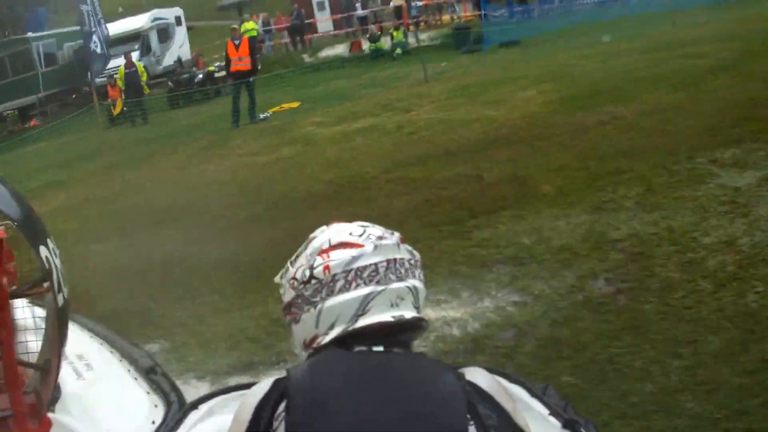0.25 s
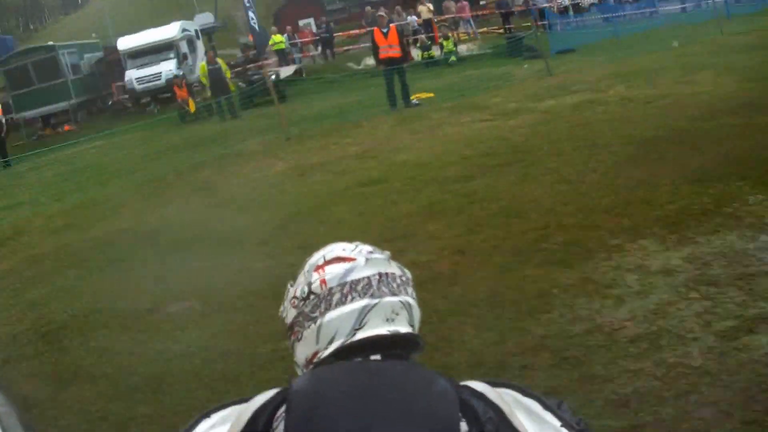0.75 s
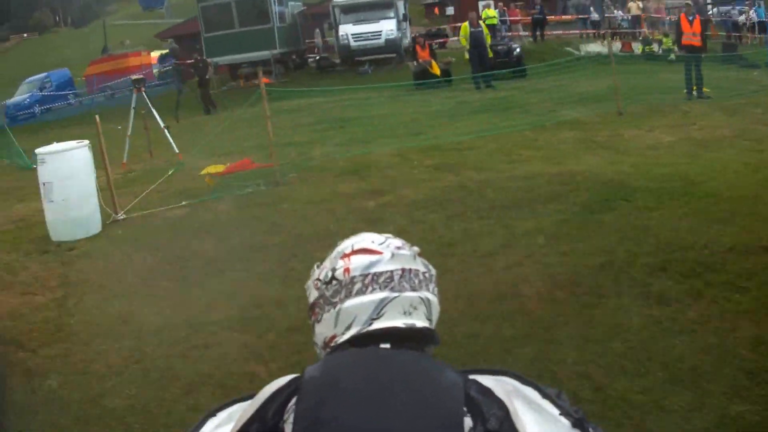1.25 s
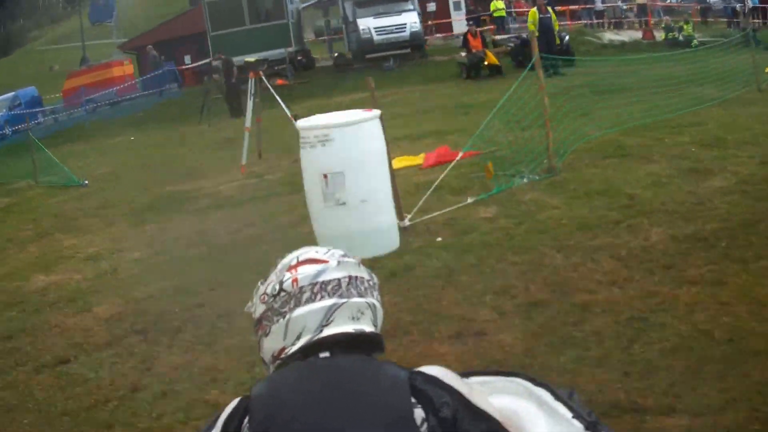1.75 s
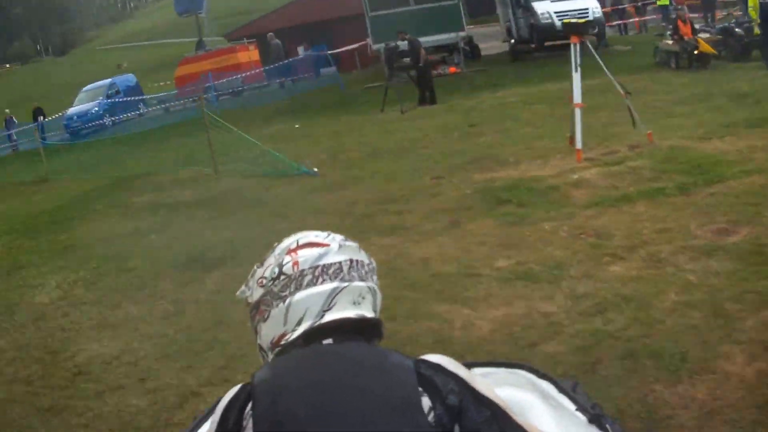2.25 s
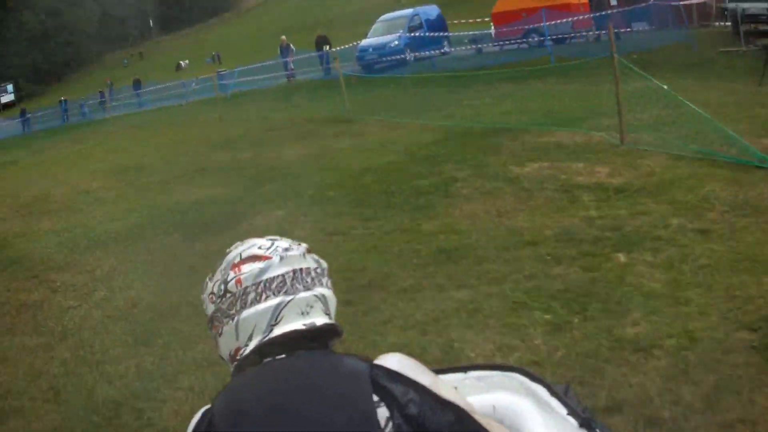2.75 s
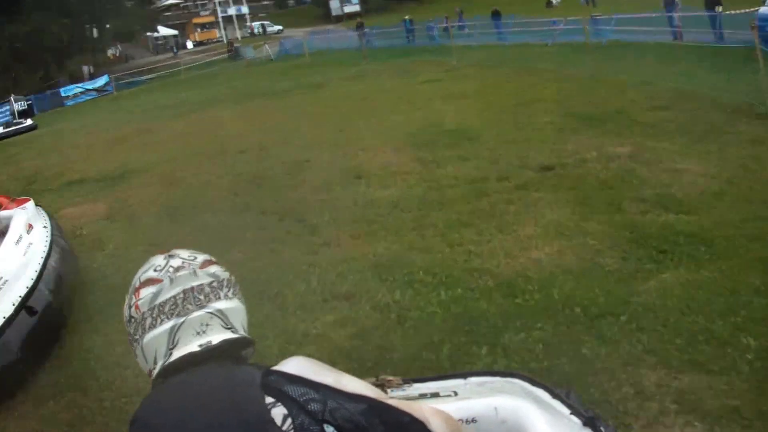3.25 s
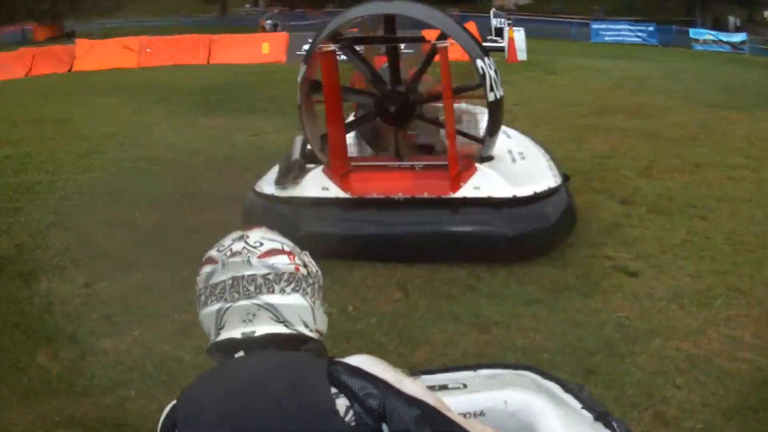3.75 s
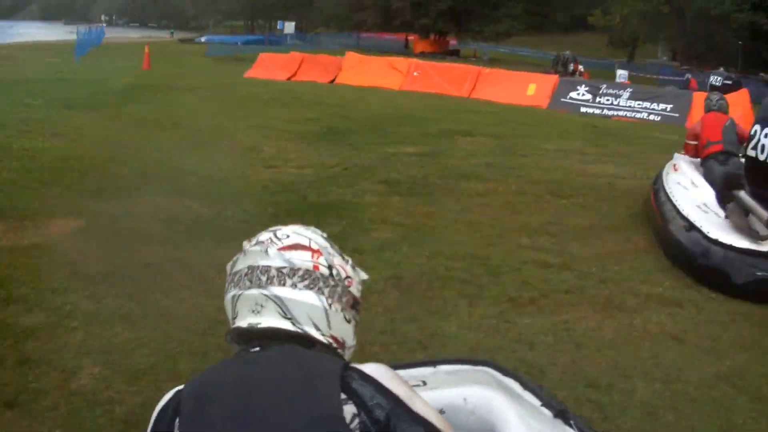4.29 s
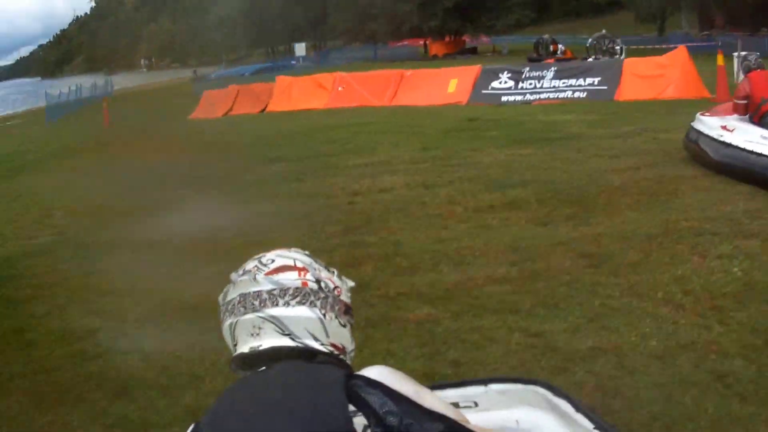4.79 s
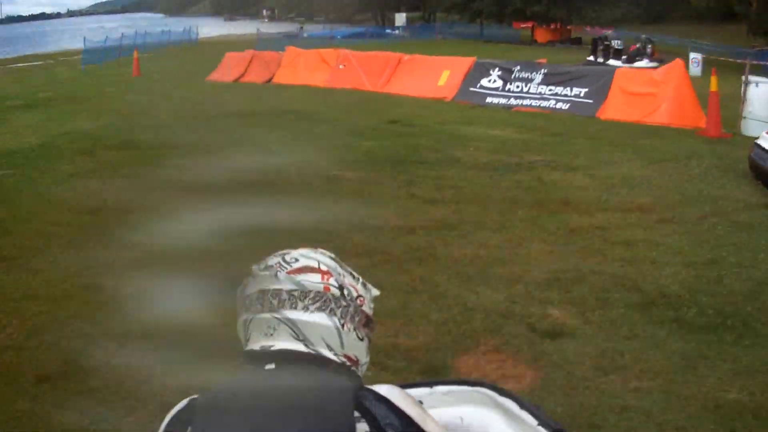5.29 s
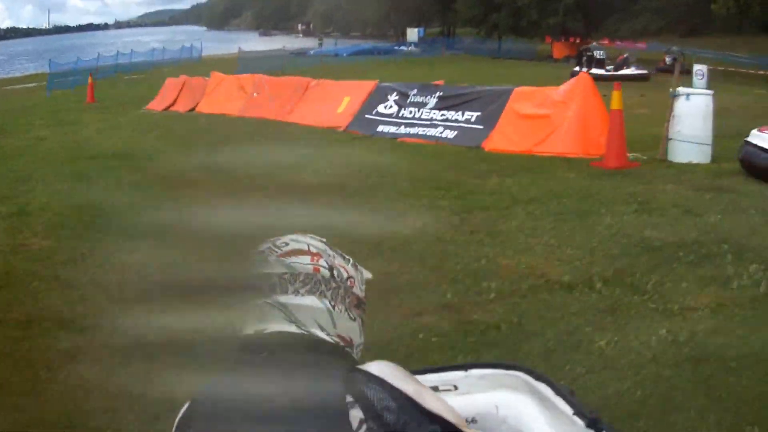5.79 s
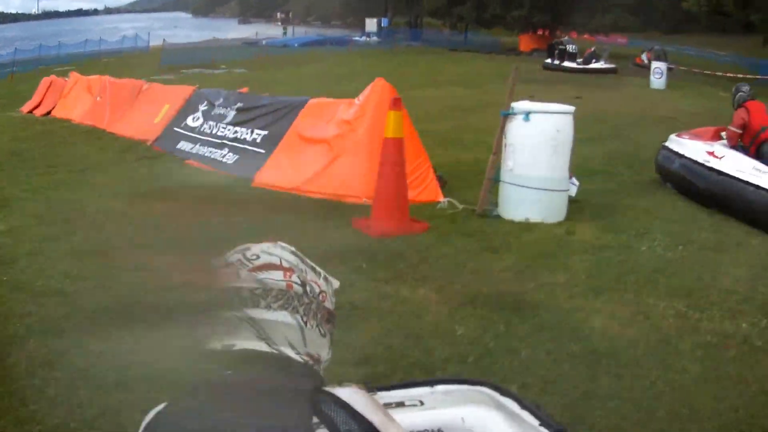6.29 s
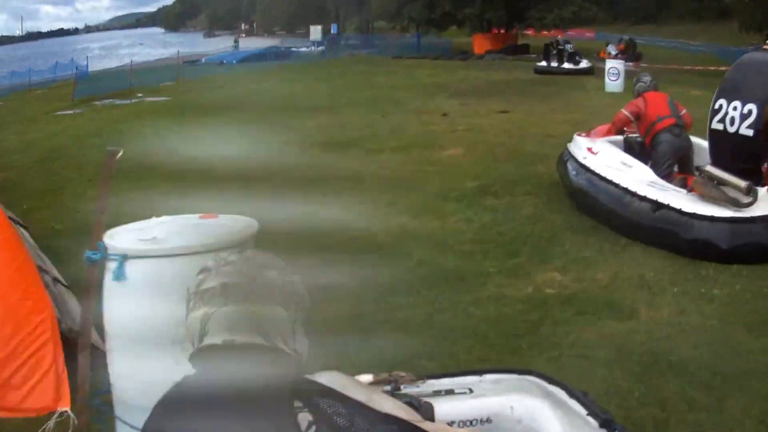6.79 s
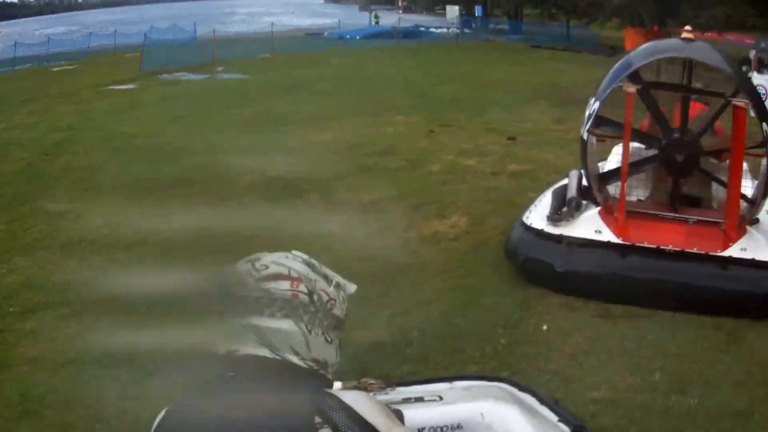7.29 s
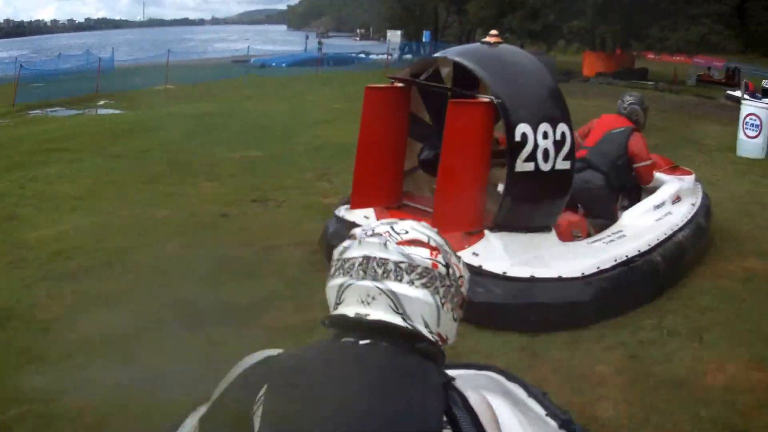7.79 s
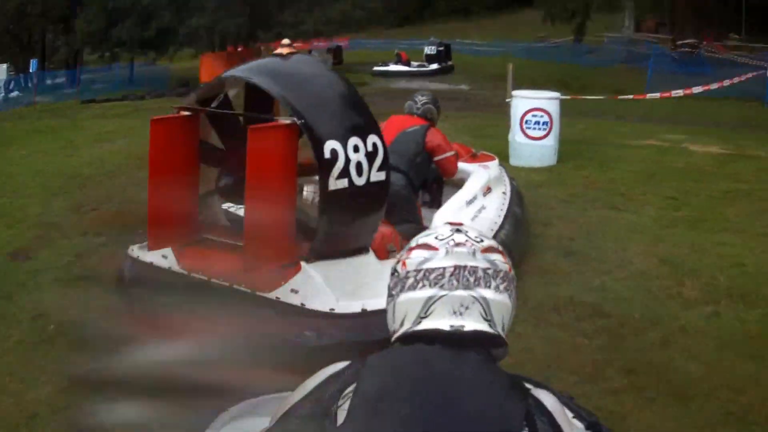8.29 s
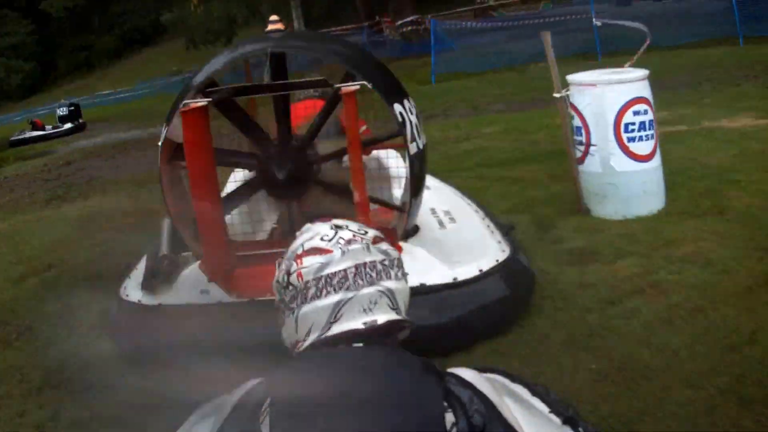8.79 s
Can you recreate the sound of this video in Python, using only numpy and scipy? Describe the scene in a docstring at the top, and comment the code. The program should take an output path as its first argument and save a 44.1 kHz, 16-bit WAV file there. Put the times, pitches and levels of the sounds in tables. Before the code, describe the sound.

Heard from inside a small housing close to the fan, a racing hovercraft's two-stroke engine buzzes steadily under thick air roar and hiss. Mount rattles and low wind thumps come in the first second. Revs climb slowly and the tone opens up, a tiny tick lands midway, then late on the throttle shuts, the note sags and barks back, with more bumps at the end.

```python
"""A racing hovercraft heard from inside a small closed housing on its fan duct. A two-stroke twin drives the
thrust fan by belt: firing and blade tones, both locked to crank angle, beat over filtered-noise air roar.
Bumps and wind shake the housing in the first second; the revs climb, the exhaust valve opens, and a speck
ticks on the housing at 4.3 s. A lone bump comes at 7.4 s, then the throttle shuts and the note sags; it
reopens at 7.64 s with a bark. More bumps and wind follow near 8.85 s, and the low end rises at the close."""
import sys
import numpy as np
from scipy import signal
from scipy.fft import rfft, irfft
from scipy.io import wavfile
from scipy.ndimage import uniform_filter1d

SR = 44100
rng = np.random.default_rng(int(sys.argv[2]) if len(sys.argv) > 2 else 0)


def digitize_waveform(pressure):
    """Quantize a signal to 16-bit integers and store it at the path in sys.argv[1].

    Rows of a 2-D input are taken as channels; values are limited to [-1, 1].
    """
    field = np.atleast_2d(pressure).T
    bounded = np.clip(field, -1, 1)
    quanta = np.round(bounded * 32767).astype(np.int16)
    wavfile.write(sys.argv[1], SR, quanta)


N = 398663
T = np.arange(N) / SR


def undb(db):
    """Level law: amplitude grows tenfold for every 20 dB."""
    return 10 ** (np.asarray(db) / 20)


def curves(table, at=T):
    """Piecewise-linear interpolation of each column against the first."""
    points, *columns = np.transpose(table)
    return [np.interp(at, points, column) for column in columns]


def unit(x):
    """Normalization to unit rms."""
    return x / np.sqrt(np.mean(x ** 2))


def band(x, lo_hz, hi_hz, order=2):
    """Butterworth bandpass filtering: maximally flat between the two edges."""
    return signal.sosfilt(signal.butter(order, [lo_hz, hi_hz], "bandpass", fs=SR, output="sos"), x)


def walk(rate_hz):
    """Slow random modulation: levels held for 1 / rate_hz, smoothed twice; spread near 1."""
    hold = int(SR / rate_hz)
    steps = np.repeat(rng.standard_normal(N // hold + 1), hold)
    return 1.25 * uniform_filter1d(uniform_filter1d(steps, hold), hold)[:N]


def turbulence(shape, flicker_db, rate_hz, count=6):
    """Broadband turbulence: coloured noise in overlapping bands that flicker independently; rms 1."""
    hz, db = np.transpose(shape)
    octave = np.log2(np.fft.rfftfreq(N, 1 / SR) + 1)
    colour_db = np.interp(octave, np.log2(hz), db, left=-90, right=-90)
    spectrum = rfft(rng.standard_normal(N)) * undb(colour_db)
    centres = np.linspace(np.log2(hz[0]), np.log2(hz[-1]), count)
    total = np.zeros(N)
    for row in np.eye(count):
        share = np.interp(octave, centres, row)
        total += undb(flicker_db * walk(rate_hz)) * irfft(spectrum * share, N)
    return unit(total)


# panel modes that lift a tone crossing them: mode_hz [Hz], half_width_hz [Hz], lift_db [dB at the mode]
PANELS = [(386, 27, 3.5), (625, 10, 2.5), (1202.4, 9.1, 5.5), (1438, 17, 4), (1720, 110, 0.5),
          (2056, 74, 2)]


def panels_db(hz, step=64):
    """Panel resonance: each mode lifts a tone in dB along a Lorentzian curve."""
    coarse_hz = hz[::step]  # the lift changes slowly
    lift = sum(db / (1 + ((coarse_hz - mode_hz) / width_hz) ** 2) for mode_hz, width_hz, db in PANELS)
    return np.repeat(lift, step)[:N]


# exhaust valve position: crank_hz [turns/s], open [0 shut to 1 open]
VALVE = [(99, .2), (103, .08), (105.9, .1), (106.9, .55), (109.2, .9), (111.5, 1)]
# overall gain on the exhaust note before the throttle acts: start_s [s], gain_db [dB]
EXHAUST_DB = [(0, -1), (.4, -3), (.85, 1.5), (2.9, 0.5), (3.6, 0.5), (4.5, -1), (6.6, 1), (7.3, 2.5),
              (7.95, 1), (8.55, 3), (8.82, -2), (9.04, 2)]
THROTTLE_SHUTS_S, THROTTLE_OPENS_S, THROTTLE_MOVE_S = 7.455, 7.64, .03
OVERRUN_DB = -14  # gain on the exhaust note with the throttle shut
SURGE_S = 0.13  # Gaussian spread of the bark after reopening


def drive(hz):
    """Engine load: speed opens the exhaust valve; the throttle cuts the note and its reopening makes a surge."""
    valve = curves(VALVE, hz)[0]
    opened = np.clip((T - THROTTLE_OPENS_S) / THROTTLE_MOVE_S, 0, 1)
    shut = np.clip((T - THROTTLE_SHUTS_S) / THROTTLE_MOVE_S, 0, 1) - opened
    surge = opened * np.exp(-((T - THROTTLE_OPENS_S) / SURGE_S) ** 2 / 2)
    return valve, curves(EXHAUST_DB)[0] + OVERRUN_DB * shut, surge


# base levels of the low tones by engine speed:
# crank_hz [turns/s], crank_db [dB rms], firing_db [dB rms], blade_db [dB rms]
HUM = [(95, -59, -43, -32), (97.8, -58, -44, -31.5), (98.7, -56.5, -48, -34.5), (101, -55.5, -43, -32.5),
       (103.3, -52.5, -40.5, -30.5), (104.6, -52.5, -40.5, -31.5), (105.8, -51, -37.5, -34),
       (107, -51, -37, -35), (110.3, -53, -35.3, -36.3), (112.3, -53, -36, -38.5)]
# phase lead of the firing tone: valve_shut_lead [rad], lead_per_hz [rad per Hz below reference], reference_hz [Hz]
FIRING_SHIFT = (.4, .06, 110.5)
SURGE_BLADE_DB = -3  # the blade tone stays low while the revs race up


def hum(hz, angle, blade, valve, surge):
    """Beating of neighbouring tones: two firings a turn against the blade passes, over the crank shake."""
    crank_db, firing_db, blade_db = curves(HUM, hz)
    by_valve, by_speed, reference_hz = FIRING_SHIFT
    lead = by_valve * (1 - valve) + by_speed * (reference_hz - hz)
    crank = undb(crank_db + 1.7 * walk(16)) * np.cos(angle + .1 * walk(20))
    firing = undb(firing_db + .6 * walk(14)) * np.cos(2 * angle + lead)
    blades = undb(blade_db + SURGE_BLADE_DB * surge + .6 * walk(14)) * np.cos(blade)
    # the crank shakes the fan: a sum tone
    sum_tone = undb(-58.5 + 2.0 * walk(9)) * np.cos(angle + blade)
    return np.sqrt(2) * (crank + firing + blades + sum_tone)


# base levels of the upper exhaust orders:
# order [multiple of crank speed], shut_db [dB rms, valve shut], open_db [dB rms, valve open]
EXHAUST = [(3, -60, -54), (4, -50, -42), (5, -48, -58), (6, -56, -59), (7, -60, -49), (8, -52, -57),
           (9, -51, -49), (10, -58, -59), (11, -55, -35), (12, -42, -44), (13, -50, -41), (14, -40, -45),
           (15, -45, -45), (16, -36, -50), (17, -41, -45), (18, -40, -43), (19, -45, -46), (20, -41, -46),
           (21, -46, -48), (22, -46, -55), (23, -53, -57), (24, -55, -55), (25, -53, -50), (26, -46, -53),
           (27, -53, -59), (28, -54, -53), (29, -52, -60), (30, -53, -64)]
BARK_ORDER, SURGE_DB = 11, 1.8  # the bark lifts orders above this one and thins those below


def exhaust(hz, angle, valve, load_db, surge):
    """Harmonic series of the crank: uneven burns shake the timing, which smears the high orders most."""
    shake = .018 * walk(30) + .015 * walk(5)  # radians of crank
    burns_db = load_db + 1.27 * walk(110)  # uneven burn strength
    out = np.zeros(N)
    for order, shut_db, open_db in EXHAUST:
        size = (1 - valve) * undb(shut_db) + valve * undb(open_db)
        flicker_db = min(0.14 * order, 2.2) * walk(7)
        bark_db = SURGE_DB * np.sign(order - BARK_ORDER) * surge
        gain = undb(burns_db + flicker_db + panels_db(order * hz) + bark_db)
        phase = order * (angle + shake) + rng.uniform(0, 2 * np.pi)
        out += size * gain * np.sqrt(2) * np.cos(phase)
    return out


def chopped_exhaust(pipe, blade):
    """Amplitude modulation: blades chop the exhaust note; the housing resonance favours a band of the result."""
    return .9 * band(pipe * np.cos(blade), 1467, 1730)


# base levels of the blade overtones: order [multiple of blade rate], level_db [dB rms]
BLADE = [(2, -51.5), (3, -53.5), (4, -58.5), (5, -56.5), (10, -47.5)]


def fan(hz, blade):
    """Blade-passing overtones: blades crossing the duct struts sound at multiples of their passing rate."""
    out = np.zeros(N)
    for order, db in BLADE:
        gain = undb(db + 3.4 * walk(9) + panels_db(order * hz))
        out += gain * np.sqrt(2) * np.cos(round(order) * blade)
    return out


# mount rattles: start_s [s], level_db [dB, envelope one length after the start], length_s [s]
BUMPS = [(0.5207, -43, 0.022), (0.555, -35, 0.019), (0.586, -48, 0.02), (0.715, -41, 0.022),
         (0.824, -36.5, 0.022), (0.873, -39, 0.022), (0.914, -43, 0.022), (7.407, -41, 0.026),
         (8.805, -43, 0.022), (8.848, -41, 0.028), (8.905, -41, 0.026)]
THUD_DB = -14  # thud through the hull, relative to the chatter


def bumps():
    """Impact excitation: each jolt sets the mount chattering in a short swell, with a dull hull thud."""
    main = band(rng.standard_normal(N), 3450, 4730, order=4)
    bright = 0.19 * band(rng.standard_normal(N), 4800, 6800, order=4)
    low = .5 * band(rng.standard_normal(N), 1400, 2900, order=3)
    chatter = unit(main + bright + low)
    thud = unit(band(rng.standard_normal(N), 35, 400))
    out = np.zeros(N)
    for start_s, db, length_s in BUMPS:
        u = np.maximum(T - start_s, 0) / max(length_s, .005)
        out += undb(db) * u * np.exp(1 - u ** 2) * (chatter + undb(THUD_DB) * thud)
    return out


# speck striking the housing: start_s [s], level_db [dB, initial amplitude before the bandpass]
GRIT = [(4.2946, -26)]


def grit():
    """Damped free vibration: a tick rings the stiff housing wall at 14.6 kHz and dies exponentially."""
    out = np.zeros(N)
    for start_s, db in GRIT:
        u = np.maximum(T - start_s, 0)
        out += undb(db) * np.exp(-u / .0012) * np.sin(2 * np.pi * 14600 * u)
    return band(out, 11000, 17000)


# base level of the air: start_s [s], roar_db [dB], hiss_db [dB], top_hiss_db [dB]
AIR = [(0, -26, -44.5, -53), (.35, -24.5, -44.5, -50.5), (.9, -25.5, -45.5, -54.5),
       (1.2, -27.5, -46.5, -54.5), (1.7, -26, -47, -55), (2.6, -28, -47.5, -55.5), (3.8, -25.5, -47, -55.5),
       (4.38, -25.3, -46, -53), (5.5, -26, -47, -55), (6.7, -26.5, -47, -54.5), (7.1, -26.5, -46.5, -52.5),
       (7.45, -26.5, -45.5, -55), (7.53, -28.5, -50, -58), (8.1, -26, -47, -55.5),
       (8.75, -26.5, -46.5, -53.5), (9.04, -25.5, -44.5, -54)]
# relative spectra inside the housing: pitch_hz [Hz], density_db [dB per Hz]
ROAR = [(130, -29.5), (300, -20.5), (450, -16.5), (900, -16.5), (1150, -13), (1330, -4), (1440, 1),
        (1560, -4), (1850, -1), (1985, 1.5), (2120, -5.5), (2450, -13), (3050, -10), (3400, -20.5),
        (4200, -40)]
HISS = [(2800, -19), (3500, 3.5), (3900, -4.5), (4400, 0.5), (4800, -4.5), (5300, -11), (5900, -7.5),
        (6500, -12), (7300, -7), (8050, -20.5), (8350, -18.5), (8900, -50), (9300, -45)]
TOP_HISS = [(8900, -57), (9300, -24), (10500, -13), (11000, -15.5), (12000, -6.5), (12700, -11.5),
            (13450, -4), (14000, -5), (14650, 0), (15250, -7.5)]
ROAR_WANDER_DB, HISS_WANDER_DB = .5, .7  # hiss and top hiss swell together


def air(angle, blade):
    """Modulated turbulence: duct roar and hiss, pulsed a little by firings and blades."""
    roar_db, hiss_db, top_db = curves(AIR)
    roar_db = roar_db + ROAR_WANDER_DB * walk(10)
    pulse = 1 + 0.075 * np.cos(angle) + 0.12 * np.cos(2 * angle) + 0.021 * np.cos(blade)
    rasp_db = 0.55 * walk(200)  # uneven gas puffs roughen the roar
    puffs = 1 + 0.042 * np.cos(2 * angle) + .06 * np.cos(blade)
    puffs = puffs * undb(HISS_WANDER_DB * walk(25))
    roar = undb(roar_db + rasp_db) * pulse * turbulence(ROAR, 0.8, 8, count=9)
    hiss = undb(hiss_db) * puffs * turbulence(HISS, 0.98, 12)
    top_hiss = undb(top_db) * puffs * turbulence(TOP_HISS, 1.8, 60, count=8)
    return roar + hiss + top_hiss


# brief low swells: wind hitting the housing, except the last row, where the low end just rises at the close:
# centre_s [s], level_db [dB at the centre, added to the steady buffet], half_length_s [s to fall to 1/e]
LOW_SWELLS = [(.2, -63, 0.065), (.55, -56, 0.056), (.85, -57, .04), (4.38, -65, 0.14), (7.5, -62, .1),
              (8.87, -53, 0.046), (9.02, -59, .04)]
# relative spectrum of hull and skirt drumming: pitch_hz [Hz], density_db [dB per Hz]
RUMBLE = [(85, -1), (130, 3), (190, 19), (300, 11.5), (420, -47), (800, -23)]
RUMBLE_DB, RUMBLE_WANDER_DB, BUFFET_DB, BUFFET_WANDER_DB = -54.5, 3, -73, 3  # steady levels and their wander
SWELL_RUMBLE_DB = 10  # hull rumble over the buffet in a swell


def low_air_and_hull():
    """Low-frequency pressure fluctuation: noise bands for the buffeting and hull rumble swell together."""
    swell = sum(undb(db) * np.exp(-((T - centre_s) / half_s) ** 2) for centre_s, db, half_s in LOW_SWELLS)
    buffet = undb(BUFFET_DB + BUFFET_WANDER_DB * walk(10)) + swell
    rumble = undb(RUMBLE_DB + RUMBLE_WANDER_DB * walk(8.9)) + undb(SWELL_RUMBLE_DB) * swell
    drumming = rumble * turbulence(RUMBLE, 1.3, 10, count=4)
    return drumming + buffet * unit(band(rng.standard_normal(N), 38, 100))


# crankshaft speed: start_s [s], crank_hz [turns/s]
SPEED = [(0, 100.3), (.2, 98.8), (.47, 98.6), (.9, 102.2), (1.18, 103.1), (1.36, 102.6), (1.64, 103.6),
         (1.82, 103.15), (2.4, 104.25), (2.72, 104.45), (2.98, 106.9), (3.28, 107.5), (3.65, 110.3),
         (4.05, 112.15), (4.67, 112.2), (5.1, 110.2), (5.75, 111.1), (6.45, 110.2), (6.64, 110.65),
         (7.0, 109.25), (7.43, 110.4), (7.47, 107.6), (7.55, 97.5), (7.6, 95.5), (7.76, 102.7), (7.93, 108),
         (8.17, 109.9), (8.36, 109.6), (8.9, 105.8), (9.04, 105.8)]
BLADES_A_TURN = 21 / 10  # blade passes for each turn of the crank
BLADE_LEAD = 1.95  # radians, starting phase of the blade tone


def scene():
    """Phase integration and superposition: one crank angle drives every engine tone, and all layers add."""
    hz = curves(SPEED)[0]
    angle = 2 * np.pi * np.cumsum(hz) / SR
    blade = BLADES_A_TURN * angle + BLADE_LEAD
    valve, load_db, surge = drive(hz)
    pipe = exhaust(hz, angle, valve, load_db, surge)
    engine = hum(hz, angle, blade, valve, surge) + pipe + chopped_exhaust(pipe, blade)
    engine = engine + fan(BLADES_A_TURN * hz, blade)
    return (engine + bumps() + grit() + air(angle, blade) + low_air_and_hull())[None]


TOP_HZ = 15300  # upper edge of the recorder's passband


def record(dry):
    """Band limiting: the recorder's steep elliptic low-pass cuts the top."""
    return signal.sosfilt(signal.ellip(10, .2, 70, TOP_HZ, fs=SR, output="sos"), dry)


dry = scene()
out = record(dry)
digitize_waveform(out)
```